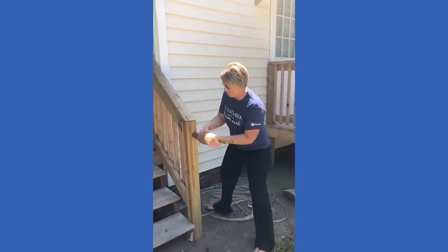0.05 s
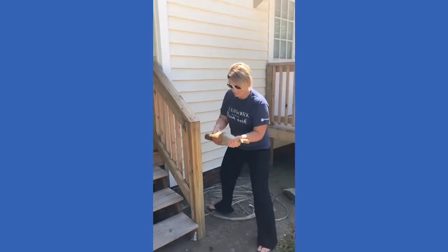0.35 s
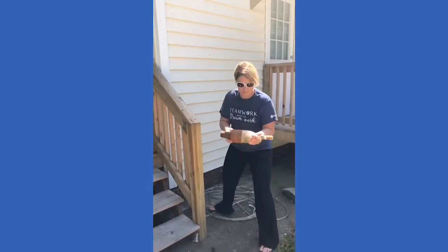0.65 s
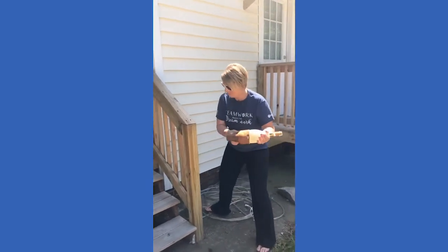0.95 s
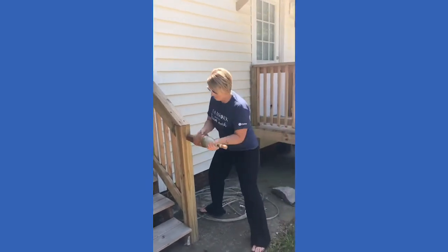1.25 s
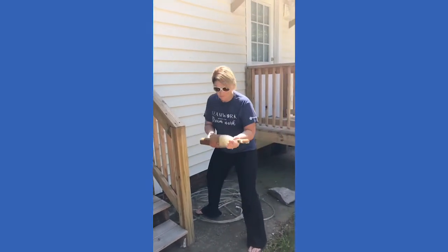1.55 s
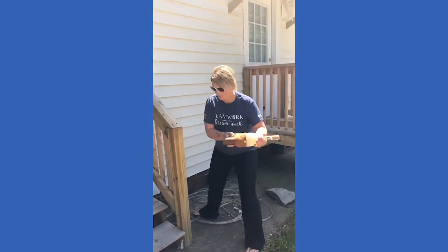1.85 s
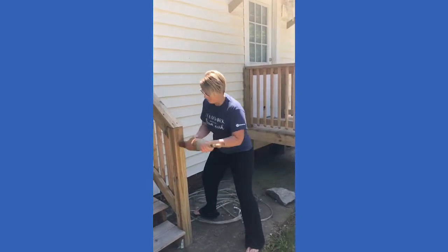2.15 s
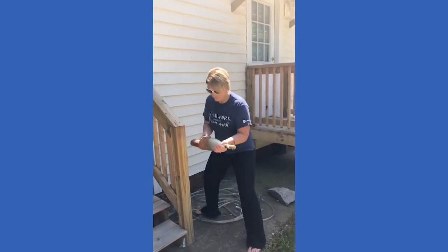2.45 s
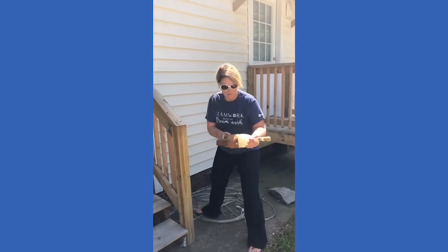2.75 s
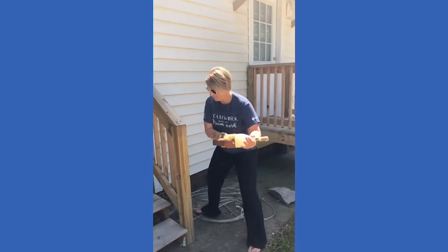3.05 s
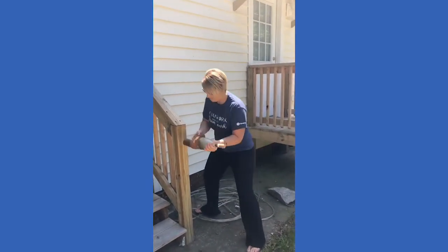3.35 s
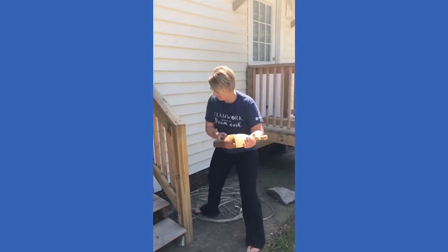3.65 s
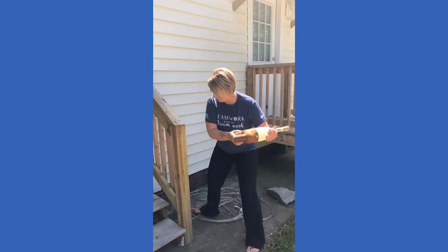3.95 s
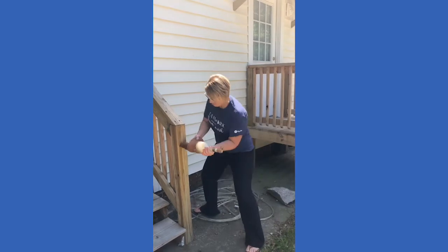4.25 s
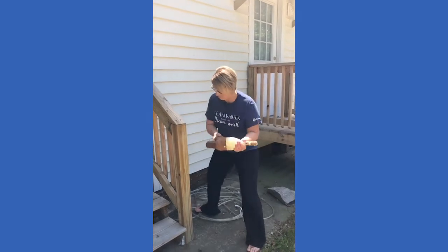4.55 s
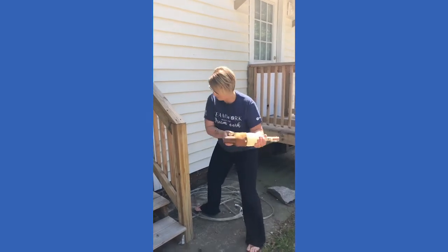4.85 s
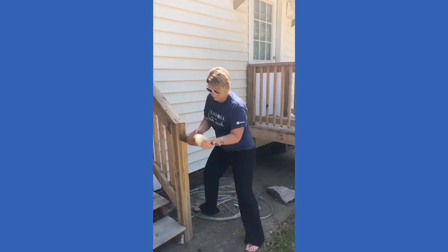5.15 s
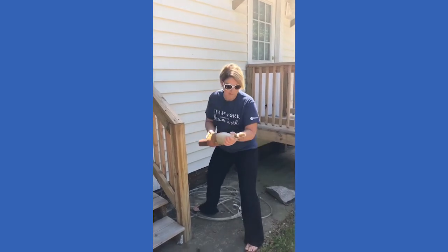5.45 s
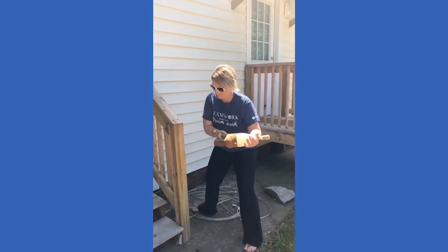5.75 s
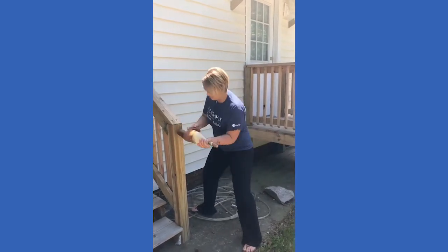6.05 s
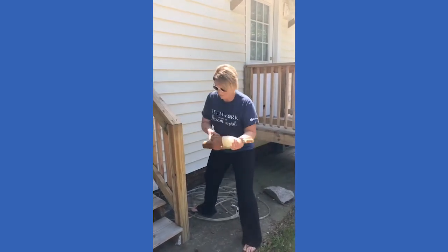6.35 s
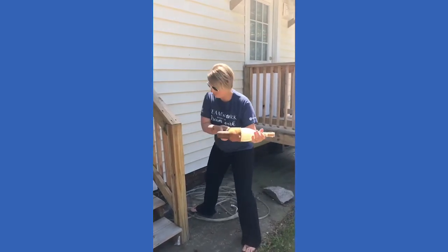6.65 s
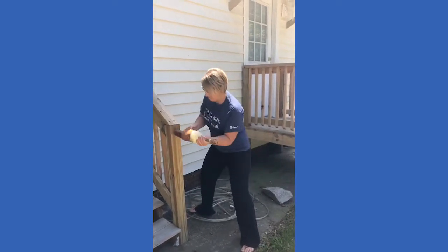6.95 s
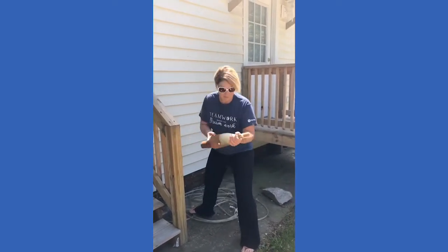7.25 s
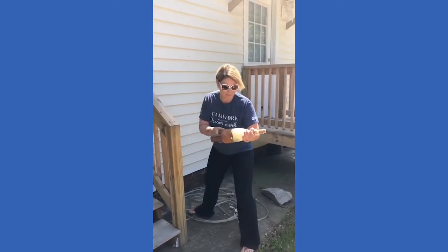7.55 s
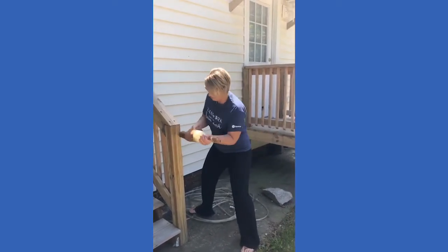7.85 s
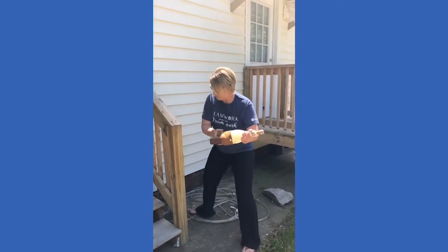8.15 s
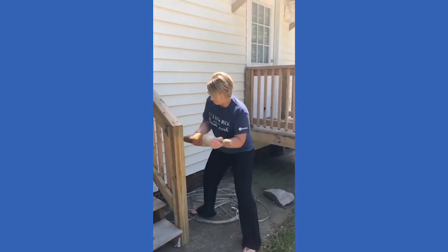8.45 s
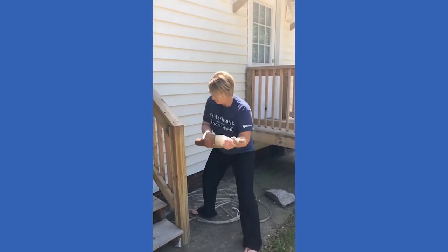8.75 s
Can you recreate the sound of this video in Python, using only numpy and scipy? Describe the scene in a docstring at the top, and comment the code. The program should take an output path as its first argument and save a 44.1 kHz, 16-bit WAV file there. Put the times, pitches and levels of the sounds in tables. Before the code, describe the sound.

A shoe with a bottle inside knocks ten times against a wooden stair post outdoors, sharp hollow blows about a second apart.

```python
"""In a back yard, a shoe with a bottle in it is knocked ten times against a wooden stair post.
Each impact cracks, rings the damped modes of heel and post, and makes the jolted liquid fizz.
The stairs boom in sympathy; house wall and deck reflect the blow and leave a thin flutter echo.
The shoe ticks in the hands, and puffs of wind bump the microphone over faint birds and a quiet hush."""
import sys
import numpy as np
from scipy import signal
from scipy.fft import rfft, irfft
from scipy.io import wavfile

SR = 44100
rng = np.random.default_rng(int(sys.argv[2]) if len(sys.argv) > 2 else 0)


def output_pcm(signal):
    """Save a mono or channel-first signal as 16-bit PCM at the path in sys.argv[1].

    Samples are clipped to [-1, 1] before scaling.
    """
    pcm = np.clip(np.atleast_2d(signal).T, -1, 1) * 32767
    wavfile.write(sys.argv[1], SR, np.round(pcm).astype(np.int16))


N = 397341
AGE = np.arange(int(.8 * SR)) / SR   # seconds since an event began
BAND_HZ = 31.25 * 2 ** np.arange(0, 9.1, .5)   # half-octave band centres


# Each row: start in seconds, strength in dB, heel note in Hz, boom in dB, snap in dB, crack in dB,
# crack tilt in dB per octave, response of stairs and yard in dB.
BLOWS = [(0.1466, 1, 693, 2.5, -1, -3.5, 0, -7), (1.2618, 1, 830, 2, -1.5, 3, 0.5, -2),
         (2.2604, 0.14, 968, 2.5, -4, 5, -0.5, 1.2), (3.2834, -1, 904, 4, -3.5, 4, 8, -0.6),
         (4.2617, -1.5, 905, 5.5, 1.5, 5, -1.5, 0.5), (5.136, 0.5, 996, 2, -3.5, -0.5, -2.5, -1),
         (6.045, -0.5, 1190, 3, -6, -3, -4, 0), (6.9497, 1.5, 1138, 2.5, -1, -4.5, -3, -0.5),
         (7.856, -1.5, 980, 4.5, -1.5, -2, 4, -0.3), (8.5761, -1.5, 1180, 1.5, 0.5, 5.5, 2.5, 2.5)]

def knocks():
    """Superposition: the responses to the separate blows add."""
    out = np.zeros(N)
    for s, db, *colour in BLOWS:
        add(out, s, from_db(db) * knock(*colour))
    return out


def knock(heel_hz, boom_db, snap_db, crack_db, tilt_db, yard_db):
    """Impact excitation: one blow sounds directly, then the stairs and the yard answer."""
    # the higher the heel rings, the less it thuds and the better it carries
    octaves = np.log2(heel_hz / 964)
    thud_db, far_db = -2 - 8 * octaves, 1 + 18 * octaves
    direct = heel() + from_db(crack_db) * crack(tilt_db)
    surroundings = echoes(direct) + stairs(boom_db) + yard(boom_db)
    sound = direct + from_db(yard_db) * surroundings + fizz(level_db=-46)
    click = crack(tilt_db=0)
    sound += slap(click) + flutter(click, first_s=.0867, round_s=.0665, first_db=-17, loss_db=10)
    sound += from_db(far_db) * (lingering_ring() + far_echo())
    # the spot of the heel that lands sets the note; a flat blow thuds, a square one snaps
    sound = .86 * sound + .67 * resonance(sound, heel_hz, width_hz=367)
    sound += (from_db(thud_db) - 1) * resonance(sound, 385, width_hz=440)
    return sound + (from_db(snap_db) - 1) * resonance(sound, 1900, width_hz=2400)


# Modes of heel and post. Each row: frequency in Hz, relative level in dB, T60 in seconds.
HEEL_MODES = [(370, -14.5, 0.02934), (676, -10, 0.023), (783, -5, 0.023), (1090, 0, 0.012),
              (1266, -13, 0.031), (1592, -12, .018), (1868, -27.5, 0.013), (2234, -22.5, 0.017),
              (2864, -27, 0.021), (3924, -28, 0.032)]

def heel():
    """Damped free vibration: heel and post ring briefly; so small a body radiates little bass."""
    ring = modes(HEEL_MODES, spread_db=.53, detune=.01).sum(axis=0) * swell(.0006)
    return from_db(3.5) * delayed(filtered(ring, 230, "high"), .00033)


# Spectrum of first contact. Each row: frequency in Hz, relative level in dB per half octave.
CRACK_SPECTRUM = [(1500, -4.5), (2800, -9), (5000, -4.5), (8000, -15), (11000, -10.5), (15000, -18.5)]

def crack(tilt_db):
    """A brief contact has a broad spectrum: the sole slaps the wood in a bright burst."""
    burst = 0
    for hz in BAND_HZ[BAND_HZ > CRACK_SPECTRUM[0][0] / 2]:
        db = at_hz(CRACK_SPECTRUM, hz)[0] + tilt_db * np.log2(hz / 7000)
        burst += from_db(db) * band_noise(hz)
    return burst * swell(.00068) * (fade(.0034) + from_db(-27.5) * fade(.064))


# Modes of stairs and railing. Each row: frequency in Hz, relative level in dB, T60 in seconds.
STAIR_MODES = [(70, -33.5, .25), (97.6, -18, 0.23), (169.3, -16.5, 0.22), (205, -35.5, 0.2685),
               (248.7, -24.5, .17), (328, -26, 0.098), (392.7, -25.5, 0.144), (455, -27.5, 0.1),
               (603.6, -18, 0.17), (677, -20.5, 0.12), (708, -20.5, 0.11), (794.4, -23.5, 0.11),
               (866, -15.5, 0.1), (981, -18.5, 0.098), (1092, -33, 0.084), (1223, -19.5, 0.092),
               (1287, -28, 0.056), (1520, -35, 0.091), (1840, -34, .08), (2362, -25.5, 0.11),
               (2830, -31, 0.11)]

def stairs(boom_db):
    """Coupled vibration: shaken through the post, each mode takes cycles to build, so bass comes last."""
    rings = modes(STAIR_MODES, spread_db=.5, detune=.0083)
    frame = np.zeros(len(AGE))
    for k, (hz, _, _) in enumerate(STAIR_MODES):
        build = swell(.001312 + 1.77 / hz)
        frame += (-1) ** k * rings[k] * build * from_db(boom_db * (hz < 400))
    return delayed(frame, .0108)


# Faint, long-lived modes. Each row: frequency in Hz, relative level in dB, T60 in seconds.
LINGERING_MODES = [(1089, -46, 0.43), (1198, -47, 0.56), (1270, -41, .5), (1390, -48.5, .45)]

def lingering_ring():
    """Light damping lets a faint ring outlast the blow."""
    return modes(LINGERING_MODES, spread_db=1.5, detune=.01).sum(axis=0) * swell(.03)


def fizz(level_db, grains_per_s=5000):
    """Shot noise: the jolted liquid fizzes in the bottle as a brief shower of random impulses."""
    grains = rng.standard_normal(len(AGE)) * (rng.random(len(AGE)) < grains_per_s / SR)
    hiss = unit_rms(filtered(grains, 8200, "high"))
    return from_db(level_db) * delayed(hiss * swell(.011) * fade(.13), .048)


# Paths by wall, deck, ground and far buildings. Each row: delay in seconds, gain in dB, cutoff in Hz.
REFLECTIONS = [(0.0145, -17.5, 5000), (0.017, -18, 4100), (0.0226, -12.5, 2613), (.0282, -14.5, 2500),
               (0.175, -36.5, 1700), (.336, -44.5, 1400)]

def echoes(direct):
    """Specular reflection: each surface returns a later, weaker, duller copy."""
    return sum(from_db(db) * delayed(filtered(direct, top_hz, "low", order=1), s)
               for s, db, top_hz in REFLECTIONS)


# Scattered sound in the yard. Each row: frequency in Hz, near level in dB per half octave,
# near T60 in seconds, tail level in dB per half octave, tail T60 in seconds.
YARD_DECAY = [(50, -44.5, 0.33, -44, 0.86), (100, -32, 0.22, -40, 0.81), (196.3, -23.5, 0.17, -36, 0.84),
              (448.7, -23, 0.24, -43.5, 0.71), (740, -19, 0.0845, -30.5, 0.45),
              (1149, -18.5, 0.13, -41.5, 0.72), (2047, -16.5, 0.073, -37, 0.58),
              (3633, -36.5, 0.073, -42, 0.41), (7140, -39.5, 0.092, -55.5, 0.66),
              (14000, -51, .12, -54, 0.45)]

def yard(boom_db):
    """Diffuse scattering: siding and deck return a dense cluster of reflections, then a weak tail."""
    out = np.zeros(len(AGE))
    for hz in BAND_HZ[1:]:
        near_db, near_t60, tail_db, tail_t60 = at_hz(YARD_DECAY, hz)
        decay = from_db(near_db) * fade(near_t60) + from_db(tail_db) * fade(tail_t60)
        envelope = delayed(decay * swell(.0055 + .78 / hz), .012)
        if hz > 300:   # the nearby railing scatters mids and highs before the wall answers
            envelope += from_db(near_db - 5) * swell(.0024 + 2 / hz) * fade(.077)
        out += envelope * band_noise(hz) * from_db(boom_db * (hz < 400))
    return out


def flutter(click, first_s, round_s, first_db, loss_db, count=4):
    """Flutter echo: the crack's treble bounces between two walls, smeared by the lap siding."""
    smear = fade(.04) * rng.standard_normal(len(AGE))
    bright = filtered(click, 8100, "high", order=1)
    bright += .55 * signal.fftconvolve(bright, smear / np.linalg.norm(smear))[:len(AGE)]
    return sum(from_db(first_db - k * loss_db) * delayed(bright, first_s + k * round_s)
               for k in range(count))


def slap(click):
    """Slap echo: one weak, bright reflection arrives just ahead of the flutter."""
    return from_db(-36) * delayed(filtered(click, 5000, "high"), .077)


def far_echo():
    """Long-path reflection: distant buildings return a dull, drawn-out wash."""
    wash = noise([750, 1450], "band") * swell(.02) * fade(.7)
    return from_db(-56) * delayed(wash, .32)


# Clicks of the shoe in the hands. Each row: start in seconds, level in dB, band centre in Hz.
GRIP_TICKS = [(0.8157, -43, 3770), (1.635, -57, 10100), (2.79, -52, 10100), (2.961, -64.5, 11000),
              (7.367, -47.5, 6200), (8.332, -47, 4520)]

def ticks():
    """Heavily damped transients: the shifting grip gives tiny dry clicks."""
    out = np.zeros(N)
    for s, db, hz in GRIP_TICKS:
        add(out, s, from_db(db) * fade(.016) * noise([hz / 1.35, hz * 1.35], "band"))
    return out


# Puffs of wind. Each row: start in seconds, length in seconds, level in dB.
WIND_PUFFS = [(0.511, 0.15, -39.5), (1.972, 0.11, -42.5), (3.41, 0.1, -30.5), (3.58, .12, -40.5),
              (5.419, 0.41, -38.5), (8.081, 0.075, -41)]

def gusts(band_hz=(52, 139)):
    """Turbulent pressure: each gust on the microphone is a low rumble that swells and dies."""
    out = np.zeros(N)
    for s, length, db in WIND_PUFFS:
        arch = np.sin(np.pi * np.minimum(AGE / length, 1))
        add(out, s, from_db(db) * arch * noise(band_hz, "band"))
    return out


# The hardest eddies. Each row: start in seconds, level in dB.
EDDIES = [(.530, -30), (.560, -25.5), (1.984, -32), (5.502, -20), (5.546, -24), (5.632, -31)]

def bumps(end_hz=75, slowing_s=.0083, hz_per_db=7):
    """Damped oscillation: an eddy gives the microphone a quick swing that slows as it dies."""
    out = np.zeros(N)
    for s, db in EDDIES:
        start_hz = 272 + hz_per_db * (db + 24.5)   # a harder bump starts with a quicker swing
        hz = end_hz + (start_hz - end_hz) * np.exp(-AGE / slowing_s)
        add(out, s, from_db(db) * swell(.0022) * fade(.067) * glide(hz))
    return out


# Bird calls. Each row: start in seconds, length in seconds, first and last pitch in Hz, level in dB.
BIRD_CALLS = [(1.76, .09, 4750, 4250, -62), (2.9, .1, 5300, 5370, -67), (3.12, .11, 4630, 5400, -65),
              (6.33, 0.04, 3850, 3430, -57.5)]

def birds():
    """Frequency modulation: each distant call is a thin tone that glides and wavers."""
    out = np.zeros(N)
    for s, length, start_hz, end_hz, db in BIRD_CALLS:
        progress = np.minimum(AGE / length, 1)
        waver = 1 + .02 * noise(200, "low")
        pitch = (start_hz + (end_hz - start_hz) * progress) * waver
        add(out, s, from_db(db) * np.sin(np.pi * progress) * glide(pitch))
    return out


# Outdoor background. Each row: frequency in Hz, relative spectral density in dB.
HUSH_SPECTRUM = [(15, -45.5), (25, -24.5), (59, 1), (117, -4.5), (223, -11), (270, -13.5), (405, -17),
                 (439, -15), (516, -19), (863, -17.5), (988, -16), (1290, -19), (4250, -29.5),
                 (16000, -47.5)]

def hush(lumpy_db, settled_db=-52.5, extra_db=3.5, settle_s=1.4):
    """Ambient noise: distant hiss over a low, amplitude-modulated breeze; both start louder and settle."""
    hz = np.maximum(np.fft.rfftfreq(N, 1 / SR), 1)
    spectrum = rfft(rng.standard_normal(N)) * from_db(at_hz(HUSH_SPECTRUM, hz)[0])
    air = unit_rms(irfft(spectrum, N))
    breeze_gain = from_db(lumpy_db * noise(7, "low", size=N))
    air += (breeze_gain - 1) * filtered(air, 250, "low", order=1)
    return air * from_db(settled_db + extra_db * np.exp(-np.arange(N) / SR / settle_s))


def modes(table, spread_db, detune):
    """Normal modes: one decaying sine per row, varied because every blow lands differently."""
    rings = []
    for hz, db, t60 in table:
        gain = from_db(db + spread_db * rng.normal())
        pitch = hz * (1 + detune * rng.normal())
        rings.append(gain * fade(t60) * np.sin(2 * np.pi * pitch * AGE))
    return np.array(rings)


def resonance(x, hz, width_hz):
    """Two-pole resonance with unit peak gain."""
    r = np.exp(-np.pi * width_hz / SR)
    feedback = [1, -2 * r * np.cos(2 * np.pi * hz / SR), r * r]
    return signal.lfilter(np.array([1, 0, -1]) * (1 - r * r) / 2, feedback, x)


def glide(hz):
    """A sine whose phase is the integral of frequency."""
    return np.sin(2 * np.pi * np.cumsum(hz) / SR)


def noise(hz, kind, size=len(AGE)):
    """Filtered Gaussian noise at unit rms."""
    return unit_rms(filtered(rng.standard_normal(size), hz, kind))


def band_noise(hz):
    """Half an octave of steady-state noise at unit rms."""
    edges = hz * 2 ** np.array([-.25, .25])
    white = rng.standard_normal(len(AGE) + SR // 10)
    return unit_rms(filtered(white, edges, "band")[-len(AGE):])


def filtered(x, hz, kind, order=2):
    """Causal Butterworth filter."""
    return signal.sosfilt(signal.butter(order, np.clip(hz, 10, .45 * SR), kind, fs=SR, output="sos"), x)


def at_hz(table, hz):
    """Interpolation of a table's columns on a log-frequency axis."""
    freqs, *columns = np.transpose(table)
    return [np.interp(np.log(hz), np.log(freqs), c) for c in columns]


def fade(t60):
    """Exponential decay, 60 dB in t60 seconds."""
    return np.exp(-np.log(1000) * AGE / t60)


def swell(rise_s):
    """Raised-cosine rise from 0 to 1."""
    return np.sin(np.pi / 2 * np.minimum(AGE / rise_s, 1)) ** 2


def delayed(x, s):
    """Pure delay of s seconds."""
    return np.interp(np.arange(len(x)) - s * SR, np.arange(len(x)), x, left=0)


def add(out, s, sound):
    """Superpose a sound at s seconds."""
    start = round(s * SR)
    out[start:start + len(sound)] += sound[:N - start]


def from_db(db):
    """Decibels to amplitude ratio."""
    return 10 ** (np.asarray(db) / 20)


def unit_rms(x):
    """Normalisation to unit rms."""
    return x / np.sqrt(np.mean(x ** 2) + 1e-20)


def scene():
    """Superposition: all sources add at one point."""
    return (knocks() + gusts() + bumps() + ticks() + birds() + hush(lumpy_db=1.9))[None]


def record(dry, cutoff_hz=16200):
    """Soft saturation rounds the loudest swings; a steep low-pass cuts the top."""
    rounded = dry / (1 + dry ** 4) ** .25
    return signal.sosfilt(signal.ellip(10, .1, 80, cutoff_hz, fs=SR, output="sos"), rounded)


dry = scene()
out = record(dry)
output_pcm(out)
```